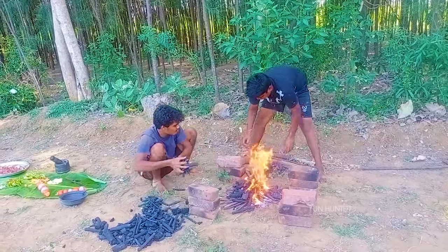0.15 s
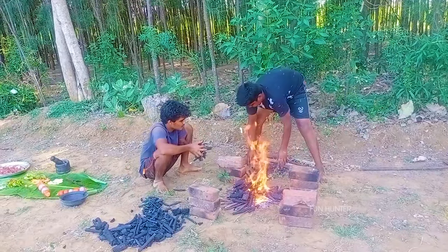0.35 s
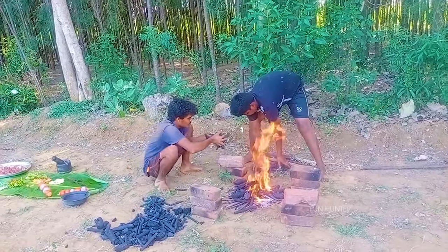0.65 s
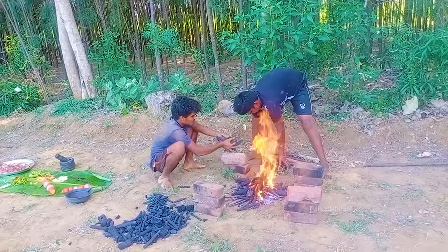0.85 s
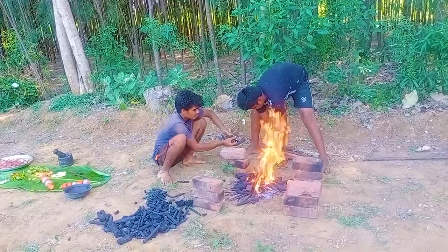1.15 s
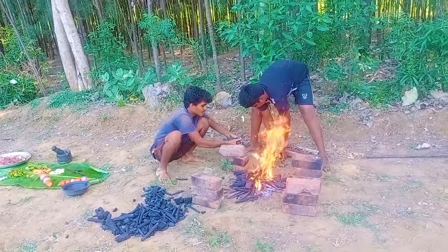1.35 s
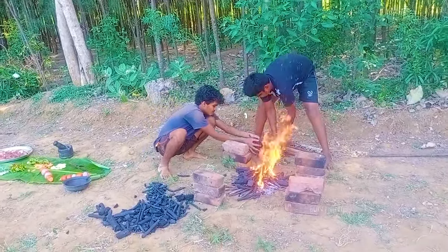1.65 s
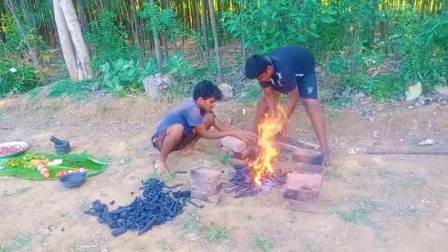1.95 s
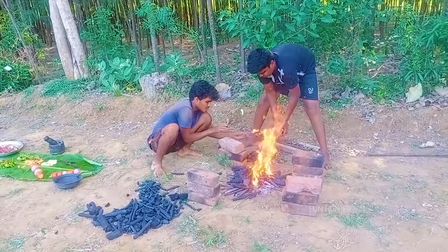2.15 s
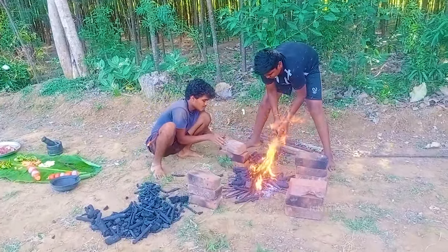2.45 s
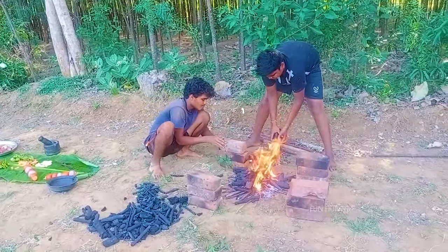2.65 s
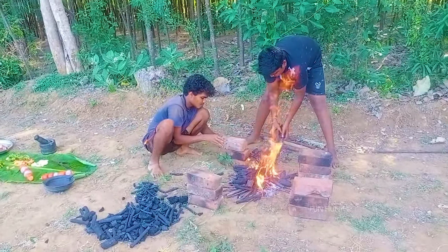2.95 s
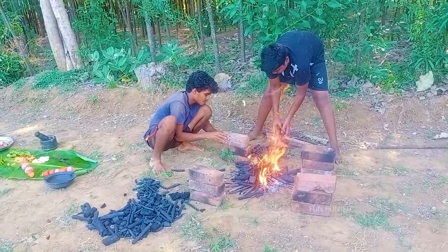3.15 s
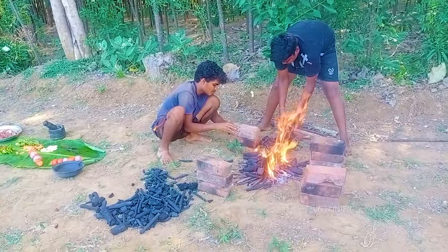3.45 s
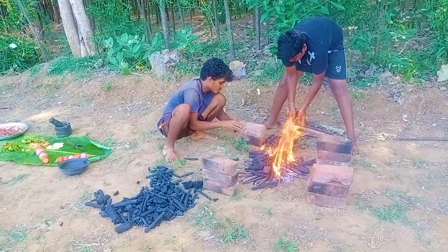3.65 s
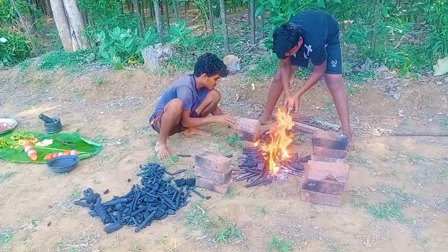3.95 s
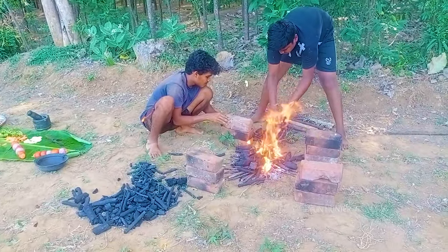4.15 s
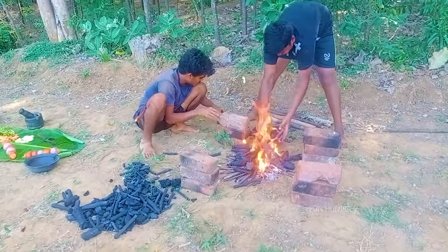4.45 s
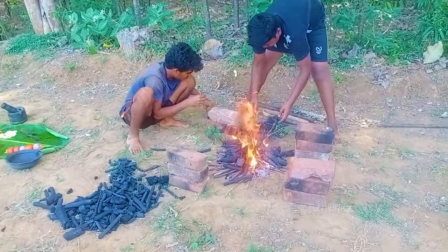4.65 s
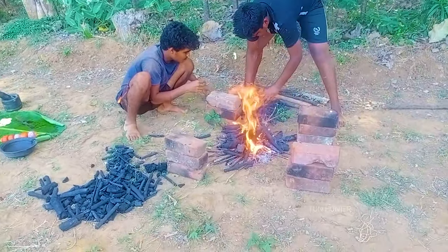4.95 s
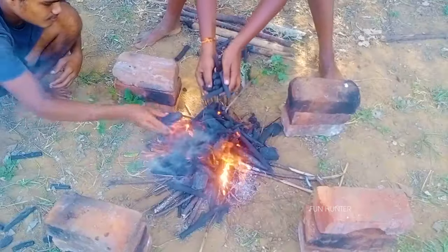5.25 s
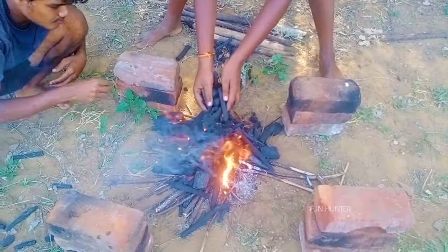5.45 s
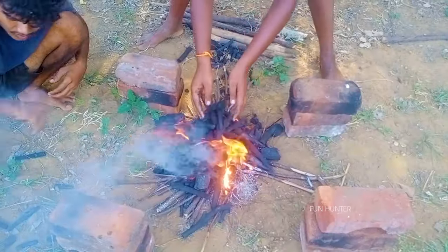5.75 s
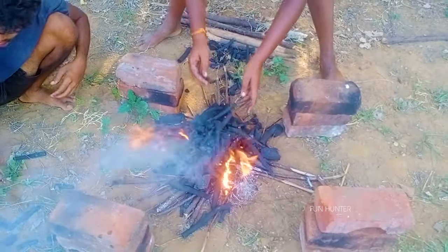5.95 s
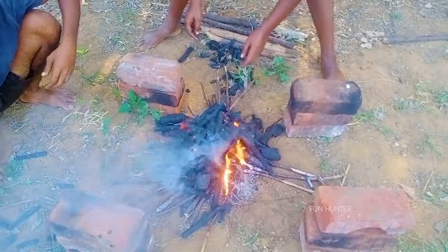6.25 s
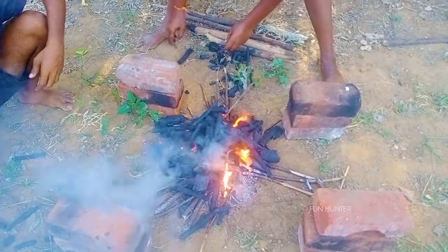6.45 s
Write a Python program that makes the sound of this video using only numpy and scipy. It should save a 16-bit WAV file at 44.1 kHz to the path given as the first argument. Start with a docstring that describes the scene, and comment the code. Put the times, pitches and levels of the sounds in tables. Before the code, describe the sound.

Light ringing clinks and rattles of charcoal handled close by, over a few twig snaps, a low flame rumble and woodland birds.

```python
"""Charcoal on a twig fire

Outdoors at the edge of a wood, hands pile charcoal on a small fire close to the microphone.
Lumps ring as they clink, scuff and rattle, loose chips tick, twigs snap and the flame rumbles low.
Birds trill and whistle among the echoing trees, over a faint background hiss.
The left microphone port is louder but has a hole in the treble."""
import sys
import numpy as np
from scipy import signal
from scipy.fft import rfft, irfft
from scipy.io import wavfile
from scipy.ndimage import uniform_filter1d

SR = 44100
rng = np.random.default_rng(int(sys.argv[2]) if len(sys.argv) > 2 else 0)


def wav_out(sig):
    """Save sig, one row per channel (or a flat mono array), as 16-bit PCM at SR to the path in sys.argv[1]."""
    wavfile.write(sys.argv[1], SR, np.round(np.clip(np.atleast_2d(sig).T, -1, 1) * 32767).astype(np.int16))


N = 291060

LUMP_SCATTER, LUMP_SCATTER_DB = 0.068, 7   # pitch and level vary from lump to lump
LESSER_GROWTH = 0.78   # knock and lesser modes grow more slowly than the blow
ROUGH_DB, HARD_DB, SOFT_DB = 4, -8, -30   # lumps still in contact ring unevenly after soft blows
BOUNCE_S, BOUNCE_DB = 0.011, -8.5
HOLLOW_HZ, HOLLOW_DEPTH = 5020, 0.52   # notch from the ground echo
# Weaker rings of every lump: (frequency [Hz], level re high ring [dB], t60 [s])
WEAK_RINGS = [(5750, -13.5, 0.035), (7130, -11, 0.041), (8220, -13.5, 0.024)]
# Dull wooden knock under every blow: (frequency [Hz], relative level [dB], t60 [s])
KNOCK_MODES = [(750, -52, 0.049), (1144, -43.5, 0.058), (1480, -37.5, 0.042), (1600, -43.5, 0.079),
               (2100, -38, 0.043), (2450, -43, .05)]
# Lump on lump, close to the microphone: (time [s], level [dB], low ring [Hz], its t60 [s],
# high ring [Hz], its level re low ring [dB], its t60 [s], relative snap level [dB])
CLINKS = [(0.11, -23, 3870, 0.027, 5380, -8, 0.023, -25),
          (0.2738, -16.5, 3970, 0.044, 4540, -2, 0.031, -23.5),
          (.573, -11, 3866, 0.045, 5680, -5.5, 0.018, -15), (0.605, -37, 4030, 0.031, 5740, -1, 0.036, -20),
          (0.6714, -34.5, 3800, 0.064, 7200, -18, 0.024, 3),
          (.8839, -39.5, 3610, 0.091, 7240, -8, 0.03, -23), (1.064, -38, 7660, 0.07, 7000, 3, 0.17, -7),
          (1.1044, -47.5, 3930, 0.031, 6920, 14.5, 0.13, -6),
          (1.254, -42, 3900, 0.035, 6120, 5, 0.069, -17), (1.787, -36, 4100, 0.11, 6400, 2, 0.069, -24),
          (1.826, -21.5, 4150, 0.034, 6256, -2, 0.068, -14), (1.8936, -33.5, 3710, 0.39, 6540, 3, 0.1, -24),
          (1.9789, -29.5, 3830, 0.07, 7000, -9, 0.082, -28),
          (2.01, -23.5, 3940, 0.13, 5630, 1.5, 0.061, -19), (2.098, -36, 3340, 0.087, 6600, 1, 0.034, -33),
          (2.5033, -38, 3500, 0.097, 6350, 0, 0.052, -26), (2.682, -29, 4600, 0.018, 5230, 1, 0.012, -16),
          (2.7997, -35.5, 4660, 0.013, 6410, 8, 0.053, -26),
          (2.8371, -24, 4140, 0.037, 6750, 7, 0.059, -1.5),
          (2.9158, -29, 3500, 0.039, 6900, -10.5, 0.13, -31),
          (3.0784, -39, 3600, 0.062, 5480, -6, .04, -23), (3.105, -43, 3700, .03, 6690, 0, .03, -20),
          (3.118, -29.5, 3840, 0.099, 6920, 2.5, 0.019, -20), (3.356, -37, 4000, 0.023, 6600, 1, .03, -10),
          (3.385, -35, 4500, .04, 6550, -2, .04, -1), (3.397, -32, 3960, .03, 6570, 6.5, 0.022, -2),
          (3.536, -39.5, 4000, 0.033, 6630, 0, 0.017, -17), (3.732, -47, 3750, 0.15, 6600, 9.5, 0.051, -26),
          (3.799, -38.5, 3870, 0.073, 7240, 11, 0.046, 9.5),
          (4.3736, -23.5, 3820, 0.021, 7140, -3.5, 0.04, -15.5),
          (4.4588, -37, 3750, 0.12, 5910, -2.5, 0.062, -27), (4.486, -32, 3830, 0.15, 5450, 3, 0.072, -31),
          (4.5063, -19.5, 3740, 0.079, 5450, -7, 0.073, -19),
          (4.6019, -36, 3630, 0.06, 5450, 2, 0.071, -12), (4.731, -34, 3910, 0.049, 5470, 5, 0.015, -11),
          (4.996, -50.5, 4120, 0.054, 5870, 6, 0.051, 14),
          (5.103, -47.5, 3450, 0.082, 6860, 10.5, 0.035, -13), (5.178, -38, 4860, 0.033, 6840, 0, .04, -16),
          (5.203, -38, 4770, 0.057, 6860, 1, 0.11, -18), (5.227, -33, 3150, 0.056, 6500, 0, 0.063, -3),
          (5.245, -31, 3770, 0.033, 6070, 0, 0.046, -6), (5.268, -34.5, 3640, 0.027, 5970, 7, 0.05, -26),
          (5.275, -41, 3670, 0.026, 5900, 7, 0.27, -24), (5.288, -26, 3015, 0.025, 5560, -6.5, 0.17, -30),
          (5.314, -33, 3240, 0.034, 6700, -4, 0.022, -22), (5.329, -34, 3860, 0.052, 5960, -9, .03, -15),
          (5.3733, -29, 3110, 0.051, 5450, -6.5, 0.071, -28), (5.402, -36, 4350, 0.054, 6100, 1, .03, -15),
          (5.425, -54, 4300, .03, 8630, 8.5, 0.1, -18), (5.437, -29.5, 4530, 0.025, 6160, -9, .06, -22),
          (5.452, -34.5, 3240, 0.026, 6570, 2, 0.051, -13),
          (5.4687, -21, 4400, 0.0089, 5000, -7, 0.009, -29), (5.516, -35, 3590, 0.026, 5330, 1, 0.036, -18),
          (5.552, -47, 3720, .033, 5750, 12, 0.043, -14), (5.576, -49, 3670, 0.033, 5830, 15, 0.089, -10),
          (5.614, -34.5, 6140, 0.03, 7900, 6, 0.029, -9), (5.633, -38, 3650, .04, 6120, -6, .03, -13),
          (5.661, -11.5, 3750, 0.024, 6440, 0, 0.036, -29),
          (5.664, -20.5, 2920, 0.041, 5300, 4, 0.023, -25),
          (5.694, -33, 2950, 0.056, 6960, -13, 0.018, -20), (5.698, -18, 4190, 0.093, 6320, -14, 0.08, -14),
          (5.7035, -24, 3700, 0.16, 6440, 2, 0.063, -20), (5.7515, -23, 3500, 0.036, 6070, 4.5, 0.043, -20),
          (5.7565, -20, 4600, 0.055, 5950, 2, 0.036, -28), (5.7636, -8, 3696, 0.11, 5980, -8.5, 0.089, -26),
          (5.799, -22.5, 4360, 0.034, 5550, 0, 0.1, -25), (5.81, -19, 4200, 0.13, 5820, -6, 0.061, -12),
          (5.851, -40, 4300, 0.041, 5730, 10.5, 0.073, -20), (5.887, -25, 4250, 0.099, 5750, -4, 0.11, -26),
          (5.901, -27, 3774, 0.072, 4250, -13, 0.05, -27),
          (5.963, -36.5, 3500, 0.058, 5950, -0.5, 0.09, -15), (5.997, -39, 3720, .15, 5950, -10, .05, -25),
          (6.022, -33, 3400, 0.1, 5950, -11, 0.084, -22), (6.041, -23.5, 4150, 0.12, 5970, -9.5, 0.17, -31),
          (6.118, -37, 4170, 0.12, 6500, -5, 0.034, -18), (6.1584, -43, 5900, 0.055, 6300, 9, 0.066, -34),
          (6.1883, -43, 4070, 0.039, 6350, 14, 0.1, -8), (6.218, -33, 3900, 0.056, 5500, 1.5, 0.076, -32),
          (6.238, -37.5, 3016, 0.18, 7130, 7, 0.093, 3), (6.236, -41, 3930, 0.11, 5780, 8, .1, -25),
          (6.247, -41, 3930, .1, 5750, 9, 0.26, -20), (6.294, -31, 3200, 0.055, 5530, -2, .05, -25),
          (6.318, -39, 3200, 0.14, 7300, 0, .1, 3), (6.3614, -29, 3500, 0.055, 5490, 5, 0.018, -16),
          (6.368, -31, 3570, 0.036, 5280, -9, .02, -20), (6.436, -3, 3395, 0.034, 6800, -34, 0.018, -30),
          (6.44, -18, 5900, 0.13, 6355, 3.5, 0.11, -28), (6.49, -41, 5850, .15, 6360, 7, 0.17, -25),
          (6.545, -49, 3200, 0.044, 6380, 12, .08, -22), (6.576, -28, 5750, 0.099, 7170, 1, 0.059, -23)]
def clinks(rise_s=0.00036):
    """A struck lump rings at two main pitches over weaker modes, a knock and a snap, then bounces."""
    out, t = np.zeros(N + 7000), np.arange(5000) / SR
    short = t[:1500]
    chances = rng.random((len(CLINKS), 5, 16, 1))
    snaps = butter(rng.standard_normal((len(CLINKS), len(short))), 1, [6000, 12000], "band")
    rebounds = rng.random((len(CLINKS), 3, 2))
    uneven = np.resize(drift(94), N + len(t))
    for row, chance, snap, bounces in zip(CLINKS, chances, snaps, rebounds):
        s, blow_db, low_hz, low_t60, high_hz, high_db, high_t60, snap_db = row
        place, phase, weakness, detune, strength = chance
        tuning = 1 + LUMP_SCATTER * (2 * detune - 1)
        scatter_db = LUMP_SCATTER_DB * (2 * strength - 1)
        hit = 0.34 * (mode(low_hz, low_t60, t) + from_db(high_db) * mode(high_hz, high_t60, t))
        onset = hit[:len(short)]   # the short sounds add into the start of the hit
        for (hz, db, t60), tune, offset_db in zip(WEAK_RINGS, tuning, scatter_db):
            onset += 0.34 * from_db(high_db + db + offset_db) * mode(hz * tune, t60, short)
        knock_db = (LESSER_GROWTH - 1) * (blow_db + 31)
        for (hz, db, t60), tune, offset_db in zip(KNOCK_MODES, tuning[3:], scatter_db[3:]):
            onset += from_db(knock_db + db + offset_db) * mode(hz * tune, t60, short)
        lesser_hz = 2400 * 3.3 ** place
        lesser_db = -9.5 + (LESSER_GROWTH - 1) * (blow_db + 54.5)
        lesser_gain = from_db(lesser_db - 12 * weakness - 17 * np.abs(np.log2(lesser_hz / 4500)))
        lesser = lesser_gain * np.sin(2 * np.pi * (lesser_hz * short + phase))
        onset += lesser.sum(axis=0) * decay(min(0.03, low_t60), short)
        onset += from_db(snap_db - 8.5) * snap * decay(0.014, short)
        glassy_hz = 7310 * (11180 / 7310) ** detune[-6:]   # six thin rings ride on the snap
        onset += from_db(snap_db - 21.5) * mode(glassy_hz, 0.048, short).sum(axis=0)
        hit *= from_db(blow_db) * (1 - np.exp(-t / rise_s))
        at = round(s * SR)
        softness = ramp(blow_db, HARD_DB, SOFT_DB)
        contact = (uneven[at:at + len(t)] - uneven[at]) * (1 - np.exp(-t / 0.004))
        hit *= from_db(ROUGH_DB * softness * contact)
        out[at:at + len(t)] += hit
        for lag, weak in bounces:
            later = at + round((0.000911 + BOUNCE_S * lag) * SR)
            out[later:later + len(t)] += from_db(BOUNCE_DB - 23 * weak - 5 * lag) * hit
    out = butter(out[:N] + 1e-18, 2, 800, "high")
    return out - HOLLOW_DEPTH * signal.lfilter(*signal.iirpeak(HOLLOW_HZ, 8, fs=SR), out)


# Hands in the charcoal, close by:
# (time [s], length [s], scuff level [dB], rattle level [dB], hollow body re scuff [dB])
HAND_MOVES = [(0.108, 0.089, -70.5, -57, 15.5), (0.24, 0.17, -72, -51, 13), (0.492, 0.24, -73, -65, 21.5),
              (0.677, 0.26, -68, -50.5, 0), (1.012, 0.19, -63.5, -51, 7.5), (1.188, 0.22, -67.5, -56, 1.5),
              (1.418, 0.11, -64, -49, 4), (1.563, 0.12, -61.5, -56, 13), (1.772, 0.15, -60, -41.5, 15.5),
              (1.966, 0.21, -78.5, -46.5, 24.5), (2.488, 0.1, -70, -47, 21.5),
              (2.648, 0.073, -71.5, -47, 19.5), (2.799, 0.12, -62.5, -46.5, 3),
              (3.118, 0.17, -71, -52.5, -17), (3.354, 0.13, -57, -43, -5), (3.89, 0.066, -68.5, -51, -32),
              (4.106, 0.025, -92, -56, 5), (4.385, 0.21, -74, -46.5, -2), (4.603, 0.035, -68, -49, 3),
              (4.74, 0.0063, -62.5, -74, -9), (5.186, 0.17, -60.5, -59, -35), (5.36, 0.12, -62, -54, 4.5),
              (5.568, 0.11, -58.5, -53, -34), (5.664, 0.16, -54, -44.5, 1.5),
              (5.839, 0.16, -61.5, -51, -13), (6.035, 0.14, -63, -48.5, -6),
              (6.221, 0.095, -61.5, -44.5, -23), (6.325, 0.22, -64.5, -69, 5), (6.52, 0.18, -65, -59, -17)]
def hand_moves(grip_s=0.061, let_go_s=0.12):
    """Gains of scuff, rattle and hollow body: each move swells in and dies away."""
    t, gains = np.arange(N) / SR, np.zeros((3, N))
    for s, length, scuff_db, rattle_db, body_db in HAND_MOVES:
        fade = np.clip(np.minimum((t - s) / grip_s, (s + length - t) / let_go_s) + 0.5, 0, 1)
        gains += fade * from_db([[scuff_db], [rattle_db], [scuff_db + body_db]])
    return gains


# Rings of the heap under the hands: (frequency [Hz], relative level [dB], t60 [s])
HEAP_MODES = [(3200, -9, 0.34), (3500, 1, 0.078), (3750, 2.5, 0.11), (4180, -5.5, 0.31), (4350, 6.5, 0.061),
              (4200, -16, 0.034), (5450, -2, 0.1), (5750, -3, 0.23), (5950, -0.5, 0.057),
              (6900, 6.5, 0.035), (7200, -3, 0.15), (7850, 5.5, 0.043), (8520, -2.5, 0.052),
              (9290, -7.5, 0.073)]
def rattle(gain):
    """Small knocks come in clusters, each exciting one ring of the heap."""
    knocks = gain * grains(per_s=600 * from_db(5 * drift(25)), spread_db=2.4)
    dealt = rng.integers(0, len(HEAP_MODES), N)
    rings = sum(from_db(db) * ring(knocks * (dealt == k), hz, t60)
                for k, (hz, db, t60) in enumerate(HEAP_MODES))
    return from_db(-5) * np.linalg.norm(gain) * rings / np.linalg.norm(rings)


# Charcoal rubbing at close range: (frequency [Hz], relative density [dB])
SCUFF_SPECTRUM = [(410, -52), (700, -43), (1160, -18), (1410, -11), (1650, -14), (1850, -7), (2080, -2.5),
                  (2460, -4), (3680, 7.5), (5020, 2), (6680, 8), (8650, -8), (11500, -12), (15500, -11)]
def scuff(gain, body_gain):
    """Grit catches and slips, ringing in cavities that open and shut, over a hollow lower body."""
    grit = grains(per_s=5000, spread_db=2.5) * from_db(3 * drift(82))
    rub = from_db(12.5) * mottled(coloured(grit, SCUFF_SPECTRUM), 4, width_hz=260, last_s=0.039)
    body = signal.sosfiltfilt(signal.butter(3, 2800, fs=SR, output="sos"), rub)
    return gain * (rub - body) + body_gain * body


def chips(per_s, cycles, count=24):
    """Chips tick in clusters, each ringing so many cycles at a pitch of its own; rms 1."""
    ticks = grains(per_s=per_s * from_db(5 * drift(32)), spread_db=3)
    dealt = rng.integers(0, count, N)
    rings = sum(ring(ticks * (dealt == k), hz, cycles / hz) * np.sqrt(hz)
                for k, hz in enumerate(np.geomspace(2600, 13000, count)))
    return coloured(rings, SCUFF_SPECTRUM)


# Faint high sizzle: (frequency [Hz], relative density [dB])
SIZZLE_SPECTRUM = [(3000, -28), (7000, -18), (10000, -18), (15500, -2)]
# Burning twigs, near the microphone: (time [s], level [dB])
TWIG_SNAPS = [(.573, -26), (0.672, -42), (2.0113, -28), (2.681, -34), (2.801, -42), (3.801, -49),
              (4.3726, -41), (5.227, -41), (5.268, -40), (5.378, -43), (5.437, -35), (5.4688, -36.5),
              (5.661, -25), (5.7565, -32), (5.887, -38), (5.9634, -45), (6.361, -38), (6.436, -34)]
def crackle(snap_t60_s=0.008, sizzle_db=-91):
    """Twigs snap in short dry bursts over a faint, uneven high sizzle."""
    t, bursts = np.arange(600) / SR, np.zeros(N + 600)
    for s, db in TWIG_SNAPS:
        at = round(s * SR)
        bursts[at:at + len(t)] += from_db(db) * decay(snap_t60_s, t) * rng.standard_normal(len(t))
    snaps = butter(bursts[:N] + 1e-18, 2, [2800, 8000], "band")
    sizzle = coloured(grains(per_s=1500 * from_db(6 * drift(8)), spread_db=3), SIZZLE_SPECTRUM)
    return snaps + from_db(sizzle_db) * mottled(sizzle, 4, width_hz=500, last_s=0.04)


# Soft thuds on the ground: (time [s], level [dB])
GROUND_THUDS = [(3.165, -66), (3.741, -64.5), (4.644, -65), (5.419, -64.5), (6.31, -66)]
def thuds(t60_s=0.091):
    """Each thud is a dull puff of noise that dies fast."""
    t = np.arange(N) / SR
    dull = rms_one(butter(rng.standard_normal(N), 2, [150, 500], "band"))
    return dull * sum((t > s) * from_db(db) * decay(t60_s, np.clip(t - s, 0, 1))
                      for s, db in GROUND_THUDS)


# The flame from beside the fire: (frequency [Hz], relative density [dB])
FLAME_SPECTRUM = [(15, -47), (25, -27), (32, -18), (78, 2.5), (108, 6), (236, -6), (307, -26), (500, -32.5),
                  (650, -77), (1100, -120)]
# Its flares: (time [s], half width [s], rise [dB])
FLARES = [(0.425, 0.1, 13.5), (0.702, 0.048, 3.5), (1.689, 0.024, 6), (3.73, 0.038, 5.5), (4.85, 0.062, 5)]
def flame(steady_db=-74):
    """The flame rumbles low and flares now and then."""
    t = np.arange(N) / SR
    flare_db = sum(db * np.exp(-((t - s) / width) ** 2) for s, width, db in FLARES)
    gain = from_db(steady_db + flare_db + 0.26 * drift(7.7))
    return gain * coloured(rng.standard_normal(N), FLAME_SPECTRUM)


# One near bird, sliding down at the end: (time [s], pitch [Hz], level [dB])
NEAR_WHISTLE = [(2.235, 2983, -62), (2.27, 2958, -51), (2.35, 2954, -50.5), (2.44, 3014, -49.5),
                (2.485, 2940, -56), (2.505, 2850, -54), (2.53, 2550, -45), (2.555, 2484, -37),
                (2.585, 2490, -37.5), (2.598, 2530, -45), (2.606, 2430, -76)]
def whistle(firm_db=-47, shaky_db=-52):
    """A long whistled sine, shaken in level and pitch while it is faint."""
    t = np.arange(N) / SR
    hz, level_db = in_time(NEAR_WHISTLE)
    shake = 0.55 * ramp(level_db, firm_db, shaky_db)
    sounding = (t > NEAR_WHISTLE[0][0]) & (t < NEAR_WHISTLE[-1][0])
    waver = drift(70) + 1j * drift(60)
    carrier = np.exp(2j * np.pi * np.cumsum(hz) / SR) * (1 - shake + shake * waver)
    return sounding * np.sqrt(2) * from_db(level_db) * carrier.imag


TRILL_PER_S, TRILL_DEPTH, HELD_DEPTH, BLIP_FALL = 31, 0.43, 0.057, 0.12
WAVER_HZ, RASP_HZ, CHIRP_BLUR = 65, 181, 0.68
WOOD_T60_S, WOOD_DB, HOOT_HZ = 0.53, -3.5, 313
# One bird's phrase, a falling chirp, two runs of blips at once and a drop:
# (delay [s], length [s], start pitch [Hz], end pitch [Hz], relative level [dB])
PHRASE = [(0, 0.0237, 2490, 1910, 0), (0.016, 0.033, 1904, 1805, 6.5), (0.107, 0.027, 2780, 2880, -11),
          (0.125, 0.031, 2920, 2800, 5), (0.149, 0.015, 2210, 2370, 2), (0.155, 0.026, 2780, 2940, 7),
          (0.165, 0.036, 2230, 2300, 1.5), (0.186, 0.015, 2910, 2920, 10.5),
          (0.206, 0.025, 2250, 2320, 1.5), (0.214, 0.021, 3010, 2980, 11.5),
          (0.223, 0.032, 2790, 2440, 6.5)]
# Its repeats: (time [s], level [dB])
PHRASE_STARTS = [(0.073, -66.5), (0.549, -67.5), (1.02, -66)]
# Quick chirps and trills among the trees, and held notes from deeper in the wood:
# (time [s], length [s], start pitch [Hz], end pitch [Hz], level [dB])
CHIRPS = [(1.528, 0.018, 2570, 2350, -55), (1.545, 0.017, 2950, 2950, -53), (1.558, 0.015, 2630, 2300, -59),
          (1.586, 0.017, 3000, 2450, -54), (1.784, 0.012, 2720, 2410, -53),
          (2.073, 0.023, 3010, 3130, -57.5), (2.103, 0.025, 3150, 3290, -48.5),
          (2.125, 0.011, 2990, 3280, -49), (2.136, 0.016, 3200, 3600, -53.5),
          (2.153, 0.03, 2780, 3047, -53.5), (2.17, 0.017, 3200, 3390, -49.5),
          (2.187, 0.02, 2700, 3006, -48), (2.202, 0.013, 3260, 3030, -51), (2.219, 0.021, 2644, 2904, -48),
          (2.412, 0.02, 2180, 2450, -57.5), (2.677, 0.013, 2090, 1900, -54)]
TRILLS = [(1.612, 0.2, 2954, 3000, -55.5), (1.617, 0.086, 1954, 2100, -57.5),
          (1.765, 0.29, 2400, 2404, -62), (1.789, 0.2, 3230, 2890, -56), (2.491, 0.11, 1900, 1904, -63.5),
          (2.499, 0.12, 3500, 3370, -58), (2.909, 0.091, 3750, 3295, -52.5), (3.024, 0.17, 3500, 3445, -62),
          (3.16, 0.12, 1980, 2088, -64.5), (3.343, 0.15, 1900, 1964, -57.5), (3.341, 0.14, 2180, 2137, -57),
          (3.34, 0.16, 1476, 1370, -62), (3.87, 0.1, 2180, 2100, -66), (3.871, 0.11, 1950, 1970, -67.5),
          (4.42, 0.15, 2060, 2210, -68.5), (5.699, 0.12, 1150, 1196, -60.5)]
FAR_CALLS = [(0.454, 0.047, 1845, 1800, -67), (0.787, 0.38, 2074, 1915, -71.5),
             (1.499, 0.085, 2270, 1825, -65.5), (2.438, 0.019, 4380, 4000, -57.5),
             (2.615, 0.042, 2446, 2510, -77), (2.675, 0.2, 3080, 3010, -58.5),
             (2.8, 0.24, 1623, 1773, -70.5), (3.5, 0.038, 1408, 1410, -72), (3.558, 0.097, 1240, 1290, -68),
             (3.755, 0.037, 1210, 1290, -72), (3.834, 0.12, 1162, 1318, -70.5),
             (4.007, 0.12, 1664, 1730, -69.5), (4.1, 0.026, 2020, 2150, -70),
             (4.167, 0.12, 1830, 1600, -73.5), (4.358, 0.14, 1623, 1732, -66.5),
             (4.403, 0.11, 966, 791, -80.5), (4.568, 0.1, 940, 916, -81), (4.595, 0.037, 2010, 2210, -68),
             (4.695, 0.089, 1278, 1163, -73), (4.822, 0.066, 1358, 1280, -71),
             (5.276, 0.044, 2260, 2340, -65.5), (5.65, 0.074, 1480, 1497, -65.5),
             (1.18, 0.066, 1220, 1170, -75), (0.114, .06, 1020, 975, -78), (3.551, 0.14, 2780, 2760, -80),
             (5.5, 0.155, 1520, 1505, -74.5), (5.81, 0.054, 2300, 2260, -63.5),
             (5.75, 0.083, 760, 750, -82), (6.055, 0.025, 2490, 2440, -64), (6.04, 0.055, 1180, 1144, -77),
             (6.22, 0.11, 1350, 1557, -72), (6.51, 0.14, 1180, 1180, -71.5),
             (5.837, 0.059, 401, 395, -76.5), (6.045, 0.055, 1400, 1325, -64),
             (6.284, 0.05, 1197, 1164, -65.5), (6.51, 0.058, 1410, 1430, -61.5),
             (6.512, 0.017, 2030, 2060, -69)]
# Faint low hoots: (time [s], length [s], level [dB])
HOOTS = [(3.155, 0.02, -72.5), (3.383, 0.084, -81.5), (4.199, .13, -78), (4.437, 0.081, -81)]
def birds():
    """Blurred gliding sines, some chopped into trills, with a woodland echo strongest on the chirps."""
    sung = [(s + lag, length, start_hz, end_hz, db + part_db)
            for s, db in PHRASE_STARTS for lag, length, start_hz, end_hz, part_db in PHRASE]
    hoots = [(s, length, HOOT_HZ, HOOT_HZ, db) for s, length, db in HOOTS]
    notes = [(*row, 0, CHIRP_BLUR) for row in sung + CHIRPS]
    notes += [(*row, TRILL_DEPTH, 1) for row in TRILLS]
    notes += [(*row, HELD_DEPTH, 1) for row in FAR_CALLS + hoots]
    direct, to_trees = np.zeros((2, N + SR))
    waver, rasp = [(drift(hz) + 1j * drift(hz)) / np.sqrt(2) for hz in (WAVER_HZ, RASP_HZ)]
    for s, length, start_hz, end_hz, level_db, trill, blur_share in notes:
        at, progress = round(s * SR), np.linspace(0, 1, round(length * SR))
        span = slice(at, at + len(progress))
        beat = TRILL_PER_S * progress * length
        hz = end_hz + (start_hz - end_hz) * (1 - progress) ** 2.516
        hz *= 1 + BLIP_FALL * trill * (0.5 - beat % 1)   # each blip falls in pitch
        hoarse = blur_share * (0.64 + 0.28 * trill)   # trills are blurred most, chirps least
        blur = np.resize((1 - trill) * waver[span] + trill * rasp[span], len(progress))
        carrier = np.exp(2j * np.pi * np.cumsum(hz) / SR) * (1 - hoarse + hoarse * blur)
        swell = np.sin(np.pi * progress) ** 0.26 * (1 - trill * np.cos(np.pi * beat) ** 2)
        edge = ramp(np.minimum(progress, 1 - progress) * length, 0, 0.005)
        note = from_db(level_db + 14) * edge * swell * carrier.imag
        direct[span] += note
        to_trees[span] += (0.64 + 0.41 * (1 - blur_share)) * note
    near = whistle()
    direct[:N] += near
    to_trees[:N] += 0.12 * near
    t = np.arange(SR // 2) / SR
    echo = rng.standard_normal(len(t)) * decay(WOOD_T60_S, t) * (t > 0.008)
    return direct[:N] + from_db(WOOD_DB) * signal.fftconvolve(to_trees, echo / np.linalg.norm(echo))[:N]


# Background hiss, coloured by the microphone's resonances: (frequency [Hz], relative density [dB])
HISS_SPECTRUM = [(180, -22.5), (300, -7.5), (553, -15), (700, -10.5), (864, -7), (1130, -14.5), (1440, -6),
                 (2490, -8.5), (2750, -1.5), (3140, -9.5), (3830, 1), (4500, -4), (4850, -11.5),
                 (5200, -1.5), (5510, 0), (6710, 3.5), (7800, -5.5), (8600, -17.5), (9500, -21.5),
                 (15600, -69)]
# Its rise and fall: (time [s], level [dB])
HISS_LEVEL = [(0, -52.5), (.27, -58.5), (2.0, -56.5), (2.85, -57.5), (4.3, -59.5), (5.11, -60.5),
              (5.3, -53.5), (5.7, -59.5), (6.6, -57)]
def background_hiss():
    """The noise floor as two noises: a patchy one and a smooth one."""
    gain = from_db(in_time(HISS_LEVEL)[0])
    first, second = [coloured(rng.standard_normal(N), HISS_SPECTRUM) for _ in range(2)]
    return gain * mottled(first, 3.2, width_hz=400, last_s=0.09), gain * second


def from_db(db):
    """Gain of a level."""
    return 10 ** (np.asarray(db) / 20)


def rms_one(x):
    """Scaled to rms 1."""
    return x / np.sqrt(np.mean(x ** 2) + 1e-20)


def ramp(x, start, end):
    """0 at start, 1 at end, held beyond."""
    return np.clip((x - start) / (end - start), 0, 1)


def decay(t60, t):
    """Falls 60 dB in t60 seconds."""
    return from_db(-60 * t / t60)


def mode(hz, t60, t):
    """A dying sine."""
    return np.sin(2 * np.pi * hz * t) * decay(t60, t)


def ring(clicks, hz, t60):
    """A unit click sets a sine of height 1 ringing."""
    r, w = decay(t60, 1 / SR), 2 * np.pi * hz / SR
    return signal.lfilter([0, np.sin(w)], [1, -2 * r * np.cos(w), r * r], clicks + 1e-18)


def butter(x, order, hz, kind):
    """A filter with a flat passband."""
    return signal.sosfilt(signal.butter(order, hz, kind, fs=SR, output="sos"), x)


def grains(per_s, spread_db):
    """Random clicks of very uneven size."""
    sizes = from_db(spread_db * np.minimum(rng.exponential(1, N), 5)) * rng.choice([-1, 1], N)
    return sizes * (rng.random(N) < per_s / SR)


def drift(hz):
    """Slow chance: noise at every 40th sample through a double one-pole low-pass; spread 1."""
    r = np.exp(-80 * np.pi * hz / SR)
    slow = signal.lfilter([1], [1, -2 * r, r * r], rng.standard_normal(N // 40 + 2002))[2000:]
    return np.interp(np.arange(N) / 40, np.arange(len(slow)), rms_one(slow))


def in_time(rows):
    """The columns of a curve at every sample."""
    s, *columns = np.transpose(rows)
    return [np.interp(np.arange(N) / SR, s, c) for c in columns]


def bin_gains(spectrum):
    """A spectrum's gain at every FFT bin."""
    hz, level_db = np.transpose(spectrum)
    bin_hz = np.maximum(np.fft.rfftfreq(N, 1 / SR), 1)
    return from_db(np.interp(np.log(bin_hz), np.log(hz), level_db))


def coloured(x, spectrum):
    """A steady source shaped to a spectrum; rms 1."""
    return rms_one(irfft(rfft(x) * bin_gains(spectrum), N))


def mottled(x, spread_db, width_hz, last_s):
    """Patches of the spectrum, so wide and so long, swell and sink at random; rms 1."""
    bins = signal.stft(x, nperseg=512)[2]
    field = rng.standard_normal(bins.shape)
    for axis, size in enumerate((width_hz * 512 / SR, last_s * SR / 256)):
        for _ in range(2):
            field = uniform_filter1d(field, size=max(round(size), 1), axis=axis)
    return rms_one(signal.istft(bins * from_db(spread_db * rms_one(field)), nperseg=512)[1][:N])


# Hollowing by the ground echo on the way to the microphone: (frequency [Hz], gain [dB])
GROUND_DIPS = [(60, -2), (3100, 0.5), (3300, -2), (3500, -1), (4500, -1), (4800, -3), (5150, -0.5),
               (5400, -1.5), (16000, -2)]
def scene():
    """Everything reaches both ports alike, but for a small share of rumble, hiss and scuff."""
    scuff_gain, rattle_gain, body_gain = hand_moves()
    rumble, side_rumble = flame(), flame()
    hiss, side_hiss = background_hiss()
    side_scuff = scuff_gain * coloured(rng.standard_normal(N), SCUFF_SPECTRUM)
    side = from_db(-26) * side_rumble + from_db(-17.5) * side_hiss + from_db(-8) * side_scuff
    loose_chips = from_db(8) * scuff_gain * chips(per_s=830, cycles=610)
    dry_cracks = from_db(-10.5) * rattle_gain * chips(per_s=260, cycles=14)
    noises = hiss + scuff(scuff_gain, body_gain) + loose_chips + dry_cracks + rattle(rattle_gain)
    hollowed = irfft(rfft(noises) * bin_gains(GROUND_DIPS), N)
    middle = rumble + hollowed + birds() + clinks() + crackle() + thuds()
    return middle + side * [[1], [-1]]


# Balance of the two microphone ports: (frequency [Hz], left minus right [dB])
PORT_BALANCE = [(60, -4), (92, 4), (140, 3.5), (210, 4), (330, 4), (500, 3.5), (770, 3.5), (1170, 8),
                (1790, 4.5), (2740, 4.5), (4190, 5), (6410, 1.5), (9810, -22), (15000, 4)]
def record(dry):
    """The ports differ in colour, their electronics add faint noise, and the top treble is cut."""
    noise_db, cutoff_hz = -79.5, 16050
    ratio = bin_gains(PORT_BALANCE)
    ports = irfft(rfft(dry) * [2 * ratio / (1 + ratio), 2 / (1 + ratio)], N)
    ports += from_db(noise_db) * rng.standard_normal((2, N))
    return signal.sosfilt(signal.cheby2(20, 60, cutoff_hz, fs=SR, output="sos"), ports)


dry = scene()
out = record(dry)
wav_out(out)
```